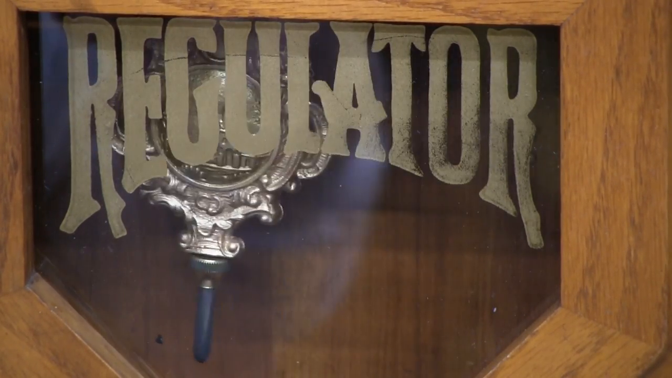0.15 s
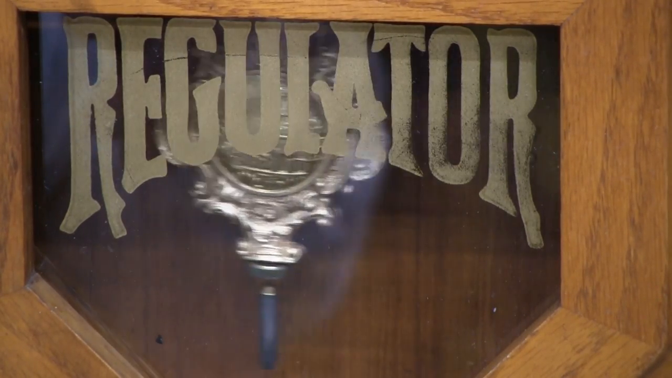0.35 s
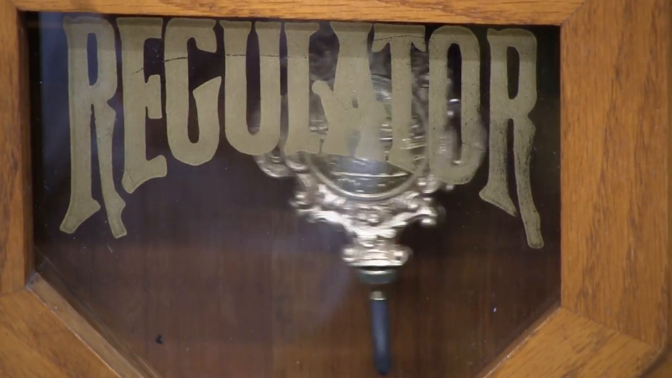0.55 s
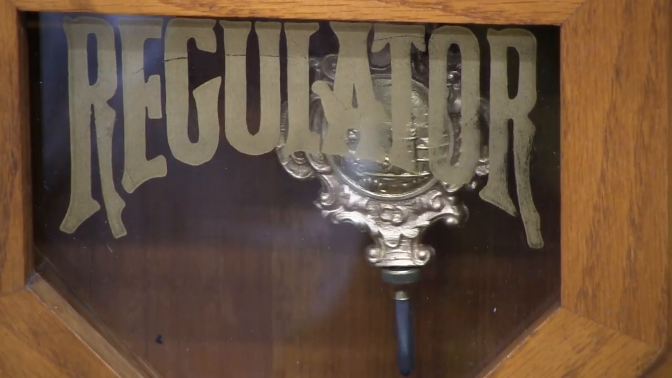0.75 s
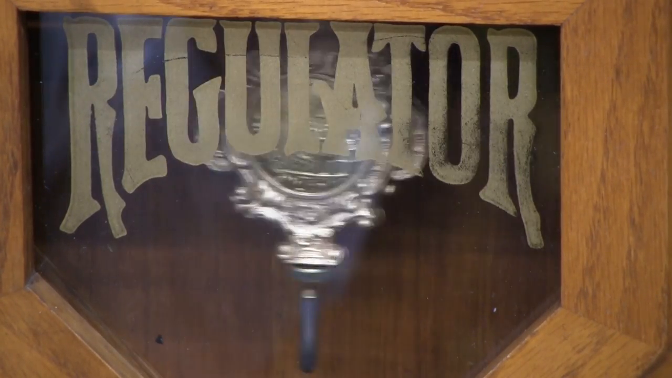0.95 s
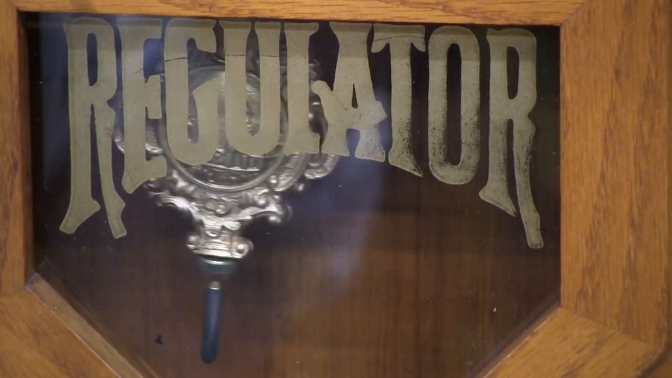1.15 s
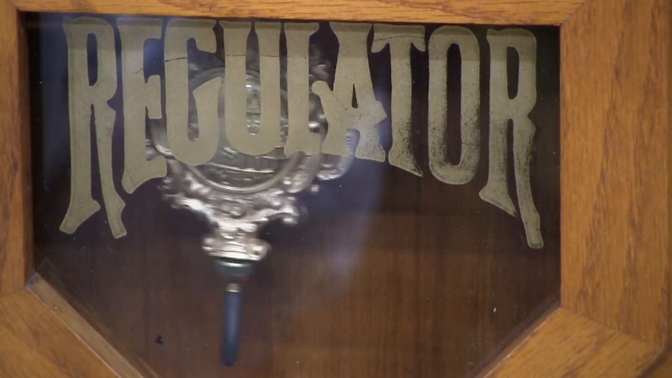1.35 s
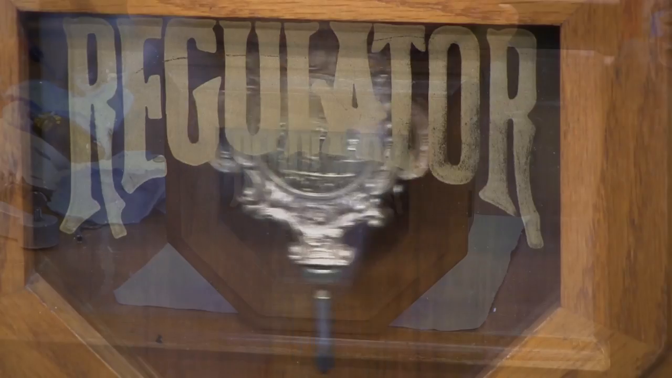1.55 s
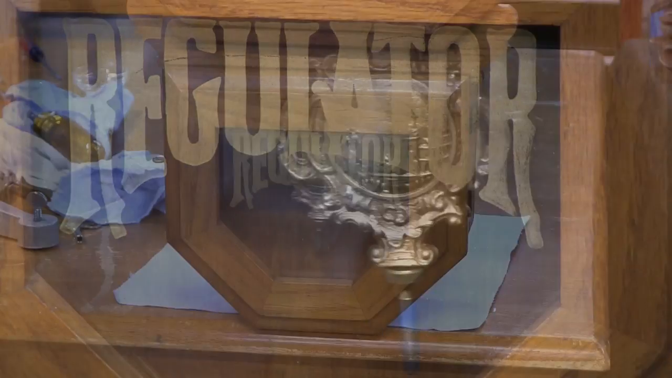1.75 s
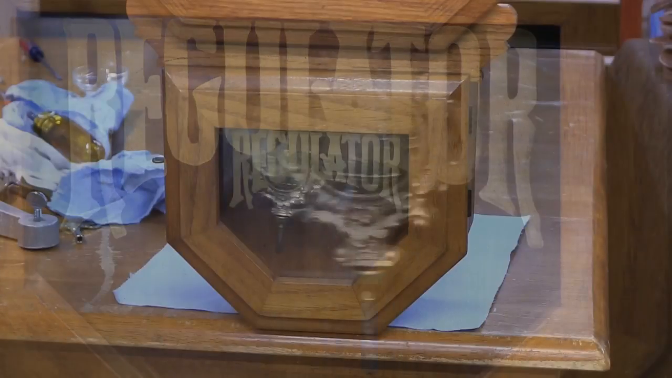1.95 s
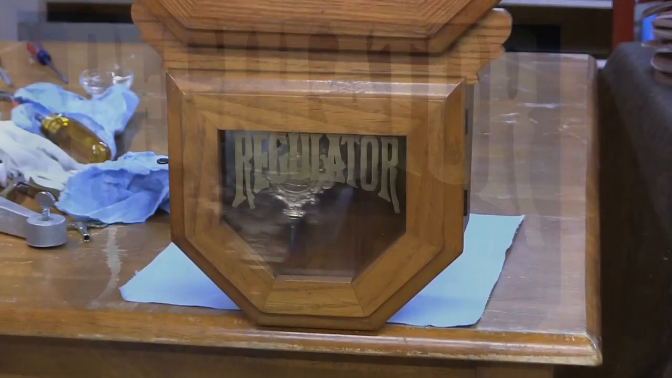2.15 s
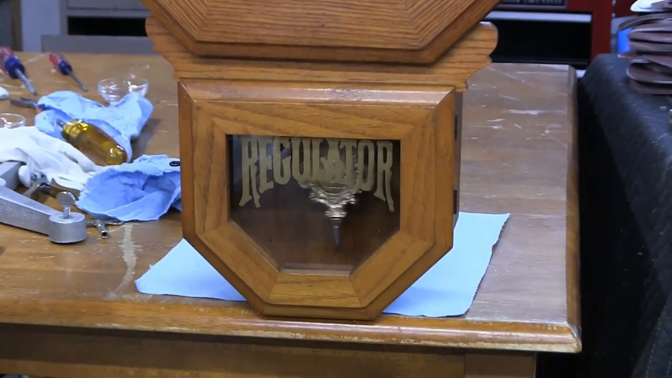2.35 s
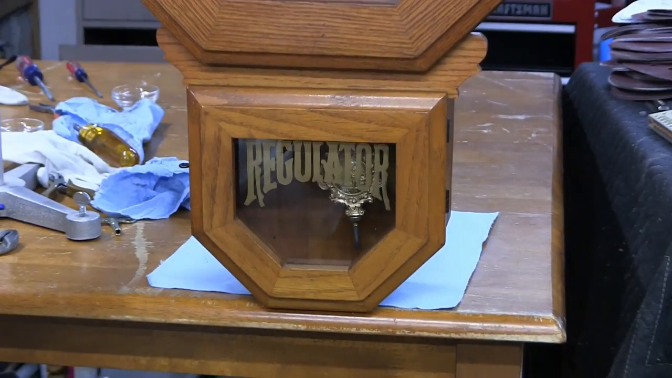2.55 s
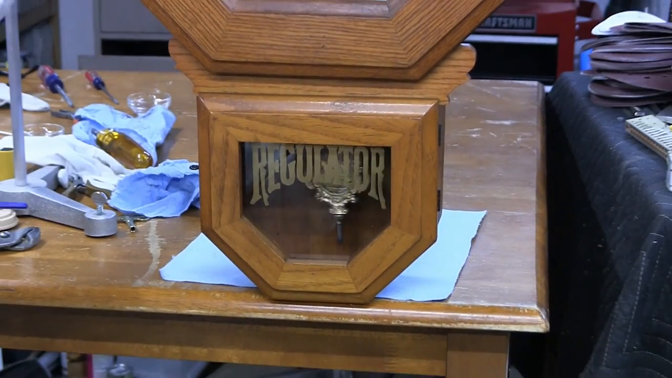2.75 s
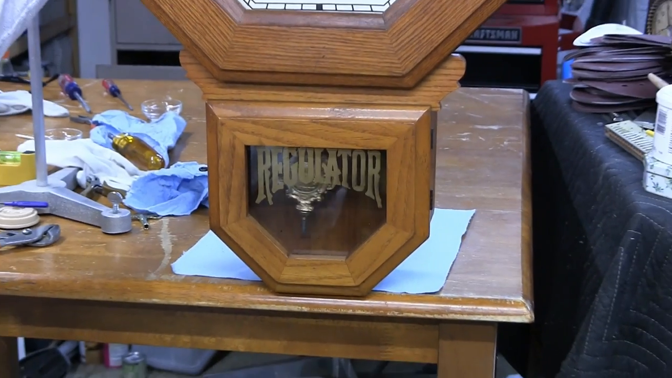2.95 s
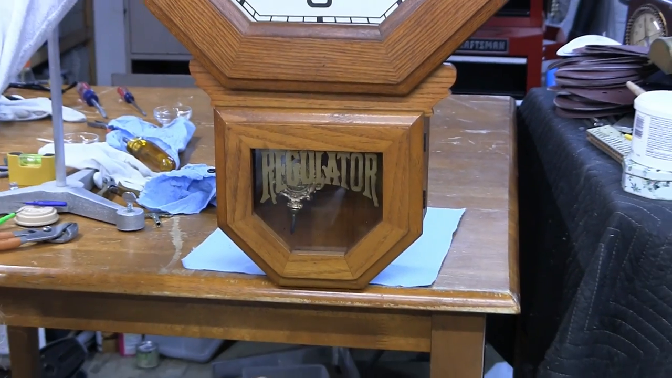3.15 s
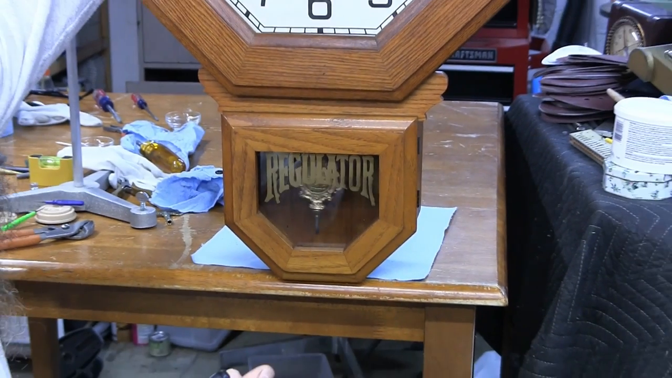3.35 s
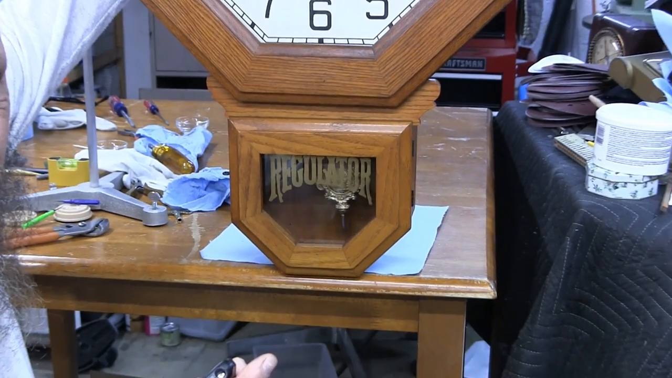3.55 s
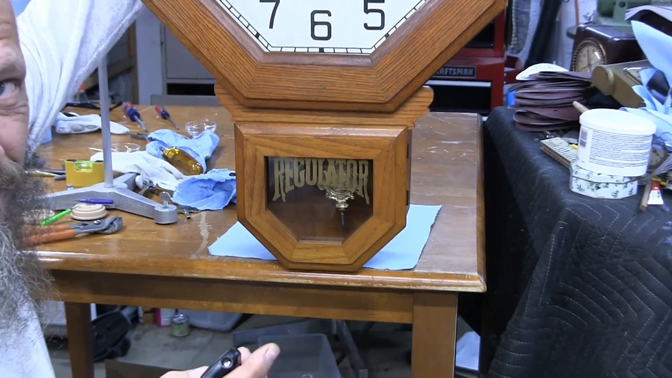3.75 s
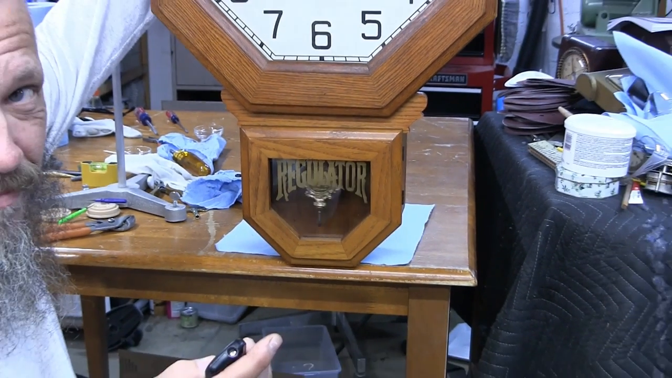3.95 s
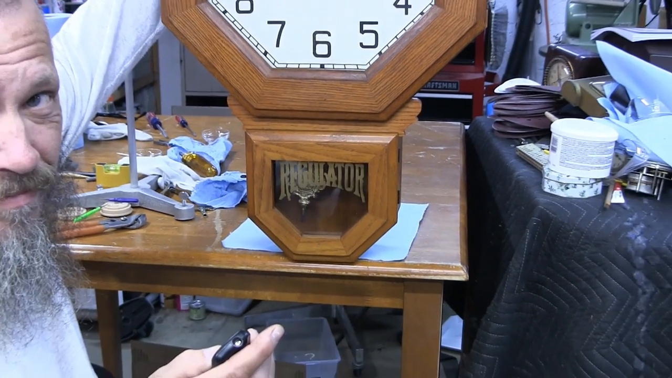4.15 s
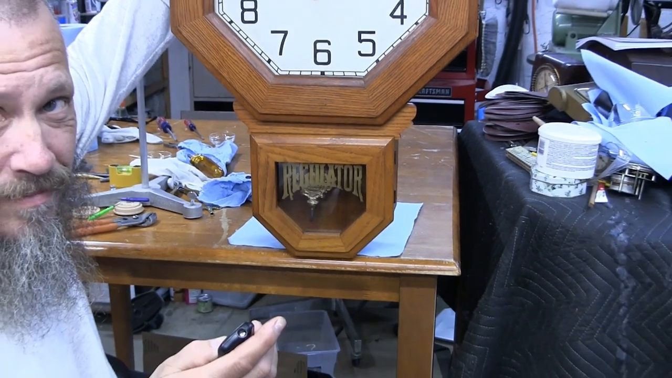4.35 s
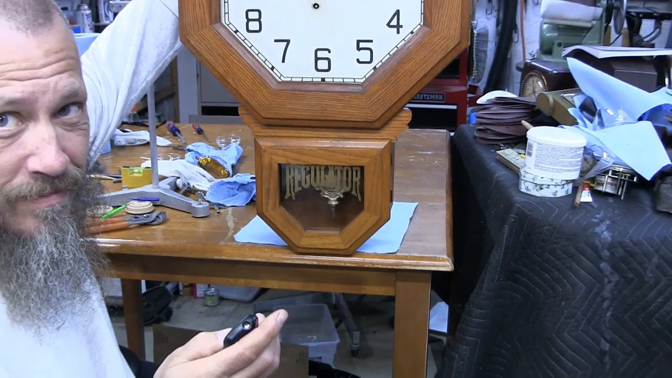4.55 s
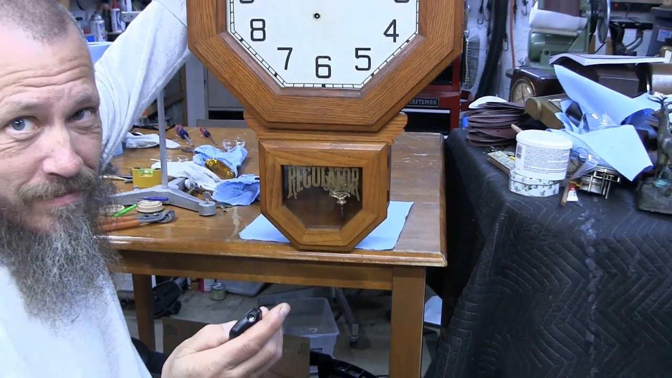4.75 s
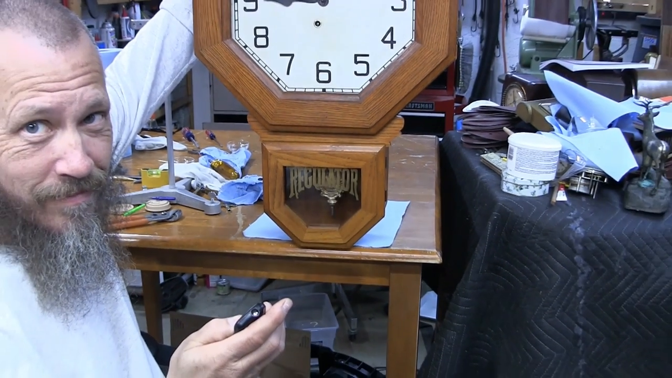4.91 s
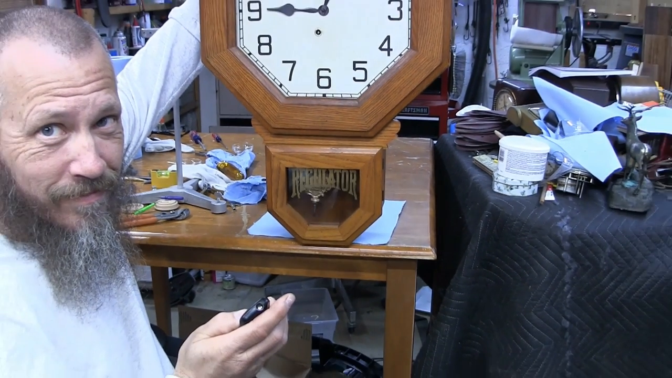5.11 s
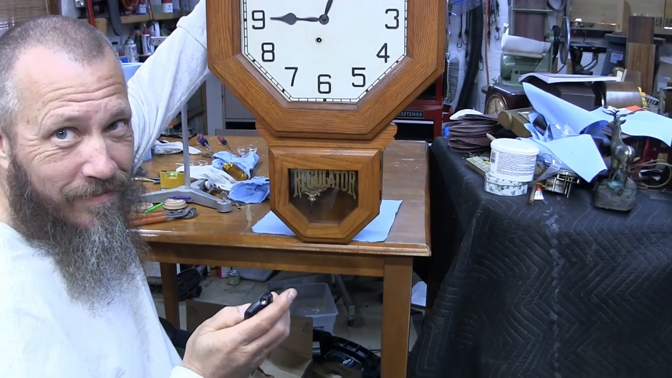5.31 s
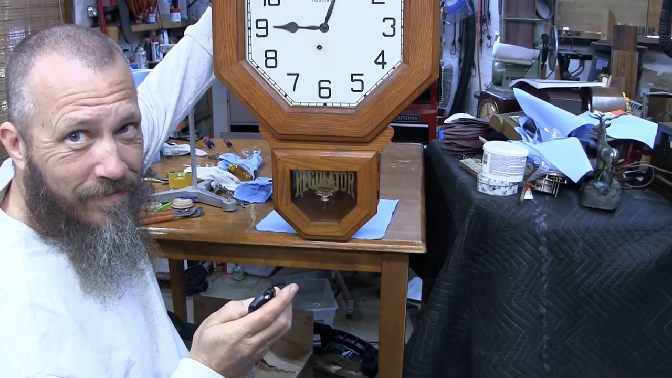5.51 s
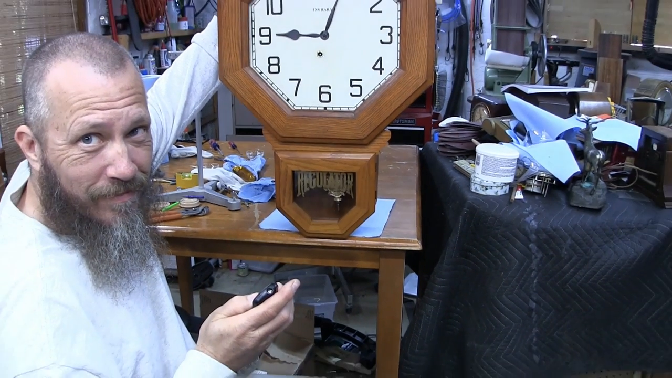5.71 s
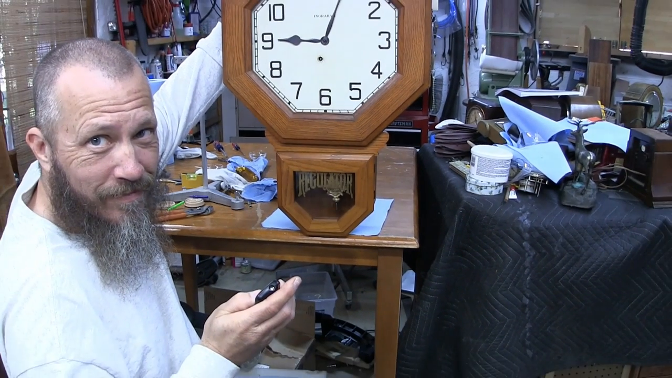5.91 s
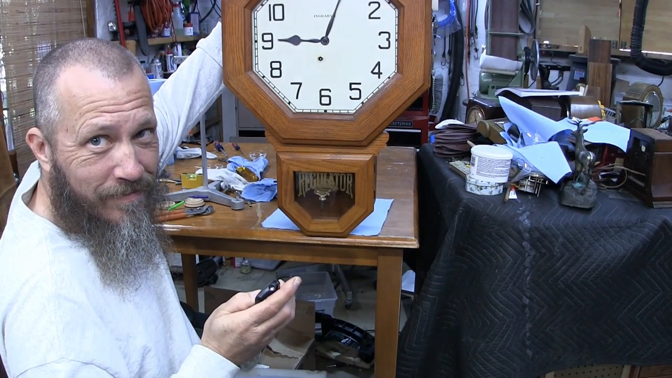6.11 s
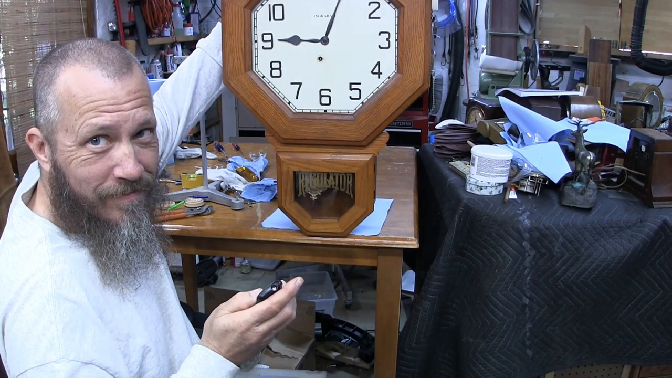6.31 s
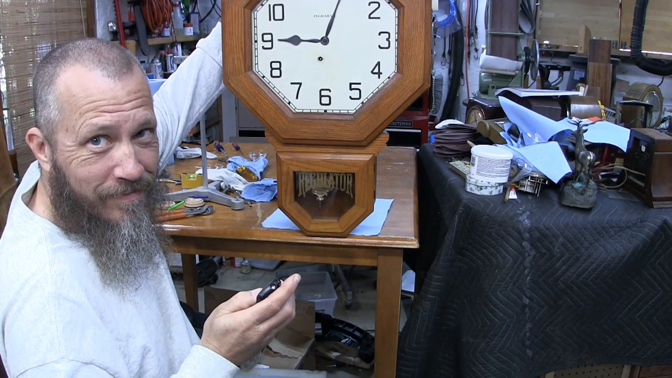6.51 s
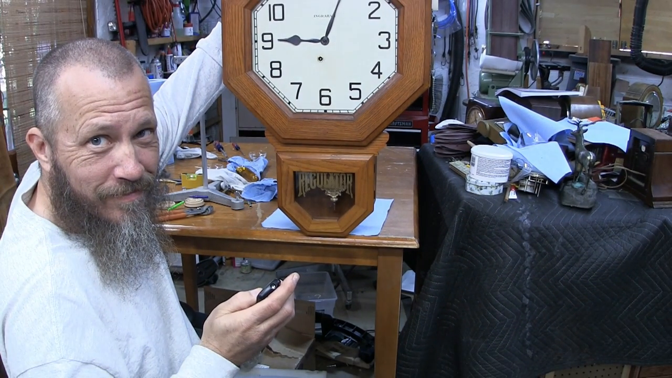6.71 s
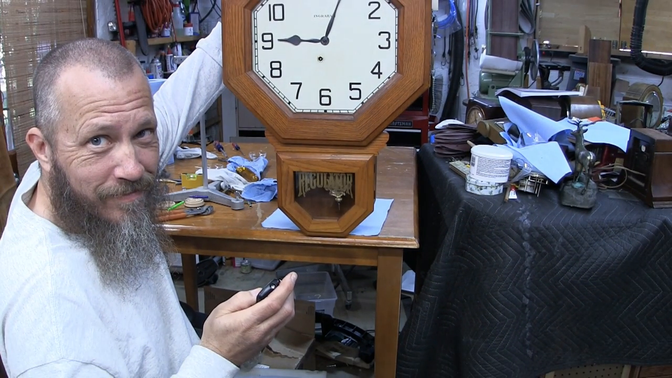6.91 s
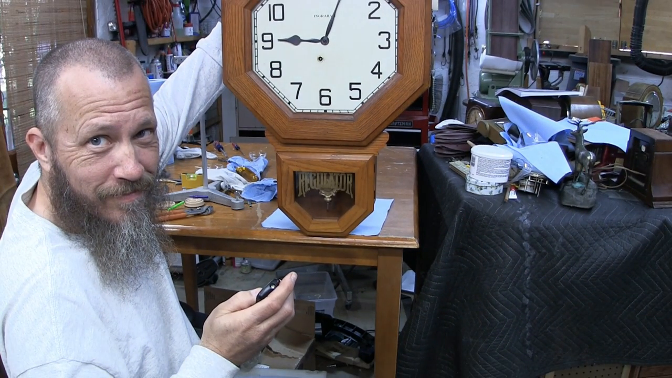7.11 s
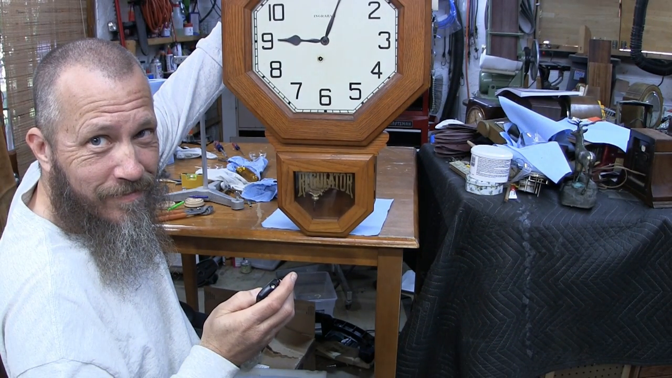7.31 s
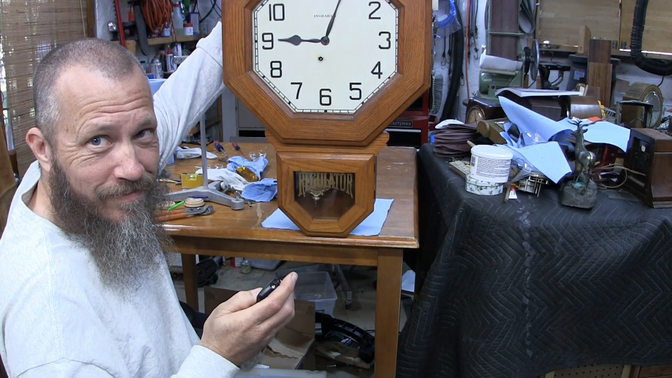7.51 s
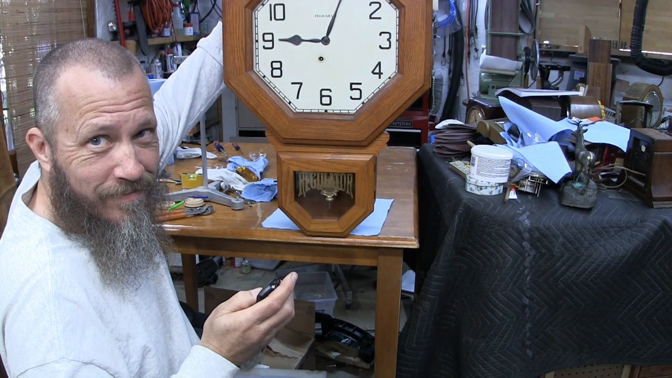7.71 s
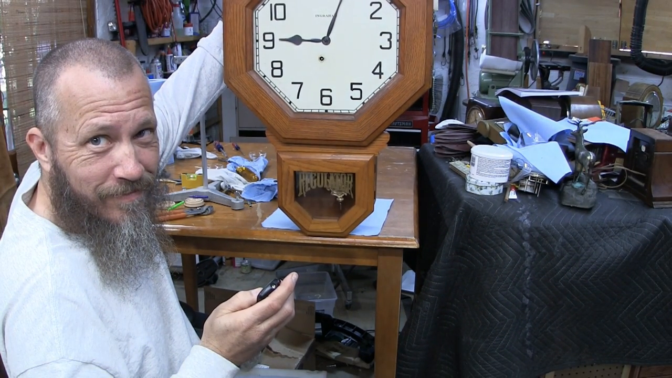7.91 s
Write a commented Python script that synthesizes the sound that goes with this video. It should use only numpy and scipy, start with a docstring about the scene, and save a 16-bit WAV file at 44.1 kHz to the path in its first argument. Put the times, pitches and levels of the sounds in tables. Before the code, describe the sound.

The slightly uneven tick-tock of a mechanical wall clock, with faint room noise and a low hum behind it.

```python
"""Tick, tock: a wooden pendulum clock ticks slightly unevenly on a table in a quiet workshop.
On every swing a toothed wheel drops onto two steel catches (pallets) in turn, and each one rings
the brass plates and the wooden case with its own tone. Early on, one run of ticking fades into
a second that is out of step with it. A motor hums far off under soft room noise,
with a few faint clicks and thin, high chirps."""
import sys
import numpy as np
from scipy import signal
from scipy.fft import rfft, irfft
from scipy.io import wavfile
from scipy.ndimage import uniform_filter1d

SR = 44100
rng = np.random.default_rng(int(sys.argv[2]) if len(sys.argv) > 2 else 0)


def bounce(signal):
    """Save signal as a 16-bit WAV file at the path given by the first command-line argument."""
    frames = np.transpose(np.atleast_2d(signal))
    limited = np.clip(frames, -1, 1)
    pcm = np.round(limited * 32767).astype(np.int16)
    wavfile.write(sys.argv[1], SR, pcm)


N = 355887
TIME = np.arange(N) / SR
RING_SIZE = 16384  # samples in one ringing sound
RING_TIME = np.arange(RING_SIZE) / SR


def gain(db):
    """Turn decibels into a number to multiply by."""
    return 10 ** (np.asarray(db) / 20)

def fade(ring_s, rise_s):
    """A level that builds up over rise_s and dies away by 60 dB in ring_s."""
    return (1 - np.exp(-RING_TIME / rise_s)) * np.exp(-np.log(1000) * RING_TIME / ring_s)

def colour(sound, hz, db):
    """Make each frequency louder or softer, following a curve through (hz, db) points."""
    all_hz = np.maximum(np.fft.rfftfreq(sound.shape[-1], 1 / SR), 1)
    curve_db = np.interp(np.log(all_hz), np.log(hz), db)
    return irfft(rfft(sound) * gain(curve_db), sound.shape[-1])

def noise_band(size, hz, width_hz):
    """Noise gathered around one pitch."""
    noise = signal.lfilter(*signal.iirpeak(hz, hz / width_hz, fs=SR), rng.standard_normal(size))
    return noise / noise.std()

def muffle(sound, hz):
    """Soften the treble above hz."""
    return signal.sosfilt(signal.butter(2, hz, fs=SR, output="sos"), sound)

def wander(rate_hz):
    """A smooth random curve that heads for a new value rate_hz times a second."""
    hold = int(SR / rate_hz)
    steps = np.repeat(rng.standard_normal(N // hold + 1), hold)
    curve = uniform_filter1d(uniform_filter1d(steps, hold), hold)[:N]
    return curve / curve.std()

def stereo(shared, side):
    """Left and right: the side part is added to one and taken from the other."""
    return np.array([shared + side, shared - side])

def add(out, start_s, sound):
    """Mix a sound in at start_s."""
    i = int(start_s * SR)
    out[:, i:i + sound.shape[-1]] += sound[..., :N - i]

def run_gain(run, time_s, start_s=1.38, length_s=1.04, curve=1.25):
    """The first run of ticking fades out as the second fades in; the level dips between them."""
    share = np.clip((time_s - start_s) / length_s, 0, 1)
    return (1 - share if run == "first" else share) ** curve


# The tone of the room's noise: pitch_hz, shared_db_per_hz, side_db_per_hz
ROOM_NOISE = [(20, -109, -104), (55, -83.5, -96), (89, -84, -84), (108.6, -75, -79.5), (171, -82.5, -92.5),
              (212, -83, -82.5), (267, -85.5, -92.5), (285, -80.5, -90), (365, -87, -91.5),
              (736, -89.5, -93), (1410, -95, -99), (5000, -99, -102.5), (16000, -104, -105)]

def room_noise():
    """A soft, steady rush, strongest in the bass."""
    hz, shared_db, side_db = np.transpose(ROOM_NOISE)
    shared, side = rng.standard_normal((2, N)) * np.sqrt(SR / 2)
    return stereo(colour(shared, hz, shared_db), colour(side, hz, side_db))


# The tones in the motor's hum: pitch_hz, level_db
MOTOR_TONES = [(30, -82), (60, -94), (73.3, -58.5), (146.5, -70), (206.8, -73), (2048, -79.5)]

def motor_hum(waver_db=0.5, drift_radians=0.1, lean_right_db=1.2):
    """A far-off motor hums; each tone wavers a little in level and pitch."""
    hum = np.zeros(N)
    for hz, level_db in MOTOR_TONES:
        level = np.sqrt(2) * gain(level_db + waver_db * wander(1.8))
        hum += level * np.sin(2 * np.pi * hz * TIME + drift_radians * wander(2.06))
    return hum * gain([[-lean_right_db], [lean_right_db]])


# Thin, falling chirps: start_s, length_s, from_hz, to_hz, level_db
HIGH_CHIRPS = [(0.545, 0.096, 6850, 5460, -60), (3.052, .12, 5150, 4900, -61),
               (3.90, .11, 5120, 4700, -61.5), (7.68, .08, 5270, 5000, -62)]

def chirps(width_hz=250):
    """High tones slide downward, blurred by distance."""
    out = np.zeros((2, N))
    for start_s, length_s, from_hz, to_hz, level_db in HIGH_CHIRPS:
        size = int(length_s * SR)
        glide = np.sin(2 * np.pi * np.cumsum(np.linspace(from_hz, to_hz, size)) / SR)
        blur = np.array([noise_band(size, width_hz / 2, width_hz) for _ in range(2)])
        add(out, start_s, 2 * gain(level_db) * glide * blur * np.hanning(size))
    return out


# Faint clicks in the room: start_s, level_db, pitch_hz
ROOM_CLICKS = [(.29, -58, 2290), (0.778, -54, 1800), (2.238, -47.5, 1040), (2.815, -45.5, 925)]

def clicks(ring_s=0.066, width_hz=650, boost_db=4):
    """Small things touch softly, so each click is dull, with little treble."""
    out = np.zeros((2, N))
    for start_s, level_db, hz in ROOM_CLICKS:
        noise = stereo(noise_band(RING_SIZE, hz, width_hz), .3 * noise_band(RING_SIZE, hz, width_hz))
        add(out, start_s, gain(level_db + boost_db) * muffle(noise, 2 * hz) * fade(ring_s, 0.0013))
    return out


def landing_db(hz, knock_db, hollow_db, bright_db):
    """The way a tooth lands changes the low knock, the hollow middle and the bright top."""
    points_hz = [200, 450, 1000, 1800, 3000, 4500]
    return np.interp(np.log(hz), np.log(points_hz), [0, knock_db, hollow_db, 0, 0, bright_db])

def ring(notes, column, tone, rise_s, scatter_db=1, scatter_radians=0.48):
    """One blow rings all of a part's notes; no two teeth land quite alike."""
    hz, ring_s, *strike_db = np.transpose(notes)
    level_jitter, phase_jitter = rng.standard_normal((2, len(hz)))
    phase = np.pi * np.arange(len(hz)) + scatter_radians * phase_jitter  # neighbours swing opposite ways
    waves = np.sin(2 * np.pi * hz[:, None] * RING_TIME + phase[:, None]) * fade(ring_s[:, None], rise_s)
    return gain(strike_db[column] + landing_db(hz, *tone) + scatter_db * level_jitter) @ waves


TICK, TOCK, SLIP = 0, 1, 2  # which level column to play
# The notes the wooden case rings at: pitch_hz, ring_s, tick_db, tock_db, slip_db
CASE_NOTES = [(218.6, 0.19, -7, -19, -23), (326.7, 0.13, -6, -17.5, -12), (398.4, 0.074, 3.5, -2, -2),
              (446.6, 0.12, 1.5, -3, -2.5), (512.6, 0.21, -12.5, -14.5, -19), (571.4, .15, -2, -.5, -24),
              (586.5, 0.08, -1.5, -1, -18), (757, 0.19, -11, -9.5, -10), (811, .13, -9.5, -11, -9),
              (1000, 0.11, -6, 4.5, -14), (1078, 0.17, -12, -3.5, -15), (1114, 0.18, -15, -4, -19)]

def wooden_case(column, tone, rise_s):
    """The case answers a tooth with a low, hollow knock."""
    return ring(CASE_NOTES, column, tone, rise_s)


# The notes the brass plates ring at: pitch_hz, ring_s, tick_db, tock_db, slip_db
PLATE_NOTES = [(1498, 0.2, -11.5, -8.5, -24), (1626, 0.15, -5, -6, -22), (1743, 0.15, -9.5, -7, -24),
               (1767, 0.13, -2.5, -8, -22), (1900, 0.13, -6, -7.5, -21), (1965, 0.1, 3.5, -8, -20),
               (2068, 0.12, -3, -20, -19), (2193, 0.16, -6, -2, -13), (2262, 0.18, -13, -11, -8.5),
               (2440, 0.2, -9.5, -28, -21), (2506, 0.19, -6, -5.5, -14), (2687, 0.12, 4, -2, -12),
               (2810, 0.19, -11, -14, -20), (2880, 0.1, -10, -7, -28), (3053, 0.16, -8.5, -7, -18),
               (3135, 0.16, -12.5, -6, -14), (3267, 0.15, -12, -7.5, -13), (3970, 0.12, -19, -10.5, -20),
               (4077, 0.2, -7.5, -17.5, -27), (4370, 0.18, -15.5, -11.5, -31),
               (5956, 0.23, -17.5, -26, -21), (7623, 0.18, -10, -14.5, -22), (7663, 0.2, -13, -12, -31)]

def brass_plates(column, tone, rise_s):
    """The plates that hold the gears answer with a high, metallic ring."""
    return ring(PLATE_NOTES, column, tone, rise_s)


def grain(ring_s):
    """Noise that stands for many crowded notes and echoes, evened out from low to high."""
    noise = rng.standard_normal((2, RING_SIZE))
    power = uniform_filter1d(abs(rfft(noise * fade(ring_s, 0.0013))) ** 2, size=30, axis=-1)
    noise = irfft(rfft(noise) / np.sqrt(power))
    return noise / noise.std()


# The clock's many weaker notes, as one curve: pitch_hz, tick_db, tock_db
WEAK_NOTES = [(130, -14, -33), (210, -3.5, -8), (463, 5, 1), (700, -4, -1), (1280, -4, -1), (1800, 3, -1),
              (3220, -1.5, -1.5), (3530, -9, -9.5), (3930, -4.5, -11), (4700, -11, -15.5),
              (7100, -19, -13.5), (8020, -9.5, -17), (8350, -19.5, -29), (14100, -30, -30)]

def wash(noise, column, tone, ring_s, rise_s, side_db=-8, room_db=-23, room_ring_s=0.5):
    """Weak notes and nearby echoes blur together, then the room rings on."""
    hz, *strike_db = np.transpose(WEAK_NOTES)
    shared, side = colour(noise, hz, strike_db[column] + landing_db(hz, *tone))
    envelope = fade(ring_s, rise_s) + gain(room_db) * fade(room_ring_s, 0.018)
    return stereo(shared, gain(side_db) * side) * envelope


# How long before the tock a tooth slips, for each run: lead_s
SLIP_LEADS = {"first": 0.098, "second": 0.077}

def tooth_slip(out, run, tock_s, knock_db, notes_db=-46, wash_db=-48, bright_db=7, ring_s=0.32):
    """Before each tock, a tooth slides along the pallet and softly stirs the case and plates."""
    start_s = tock_s - SLIP_LEADS[run]
    tone = (knock_db, 0, 0)
    notes = wooden_case(SLIP, tone, rise_s=0.0038) + brass_plates(SLIP, tone, rise_s=0.0038)
    blur = wash(grain(ring_s), TOCK, (knock_db, 0, bright_db), ring_s, rise_s=0.0026)
    add(out, start_s, run_gain(run, start_s) * (gain(notes_db) * notes + gain(wash_db) * blur))

def tooth_scrape(drag_s, level_db=-53, louder_db_per_s=190, shortest_s=.009, stretch=0.4):
    """A tooth rubs off the pallet's edge; the more it drags, the louder and longer the rub."""
    drag_s = max(drag_s, 0)
    size = int((shortest_s + stretch * drag_s) * SR)
    rub = noise_band(size, hz=2400, width_hz=1500)
    return gain(level_db + louder_db_per_s * drag_s) * rub * np.linspace(0, 1, size)

def tooth_crack(pitch_hz=2350):
    """Steel meets brass: a sharp snap, only a few waves long."""
    snap = np.sin(2 * np.pi * pitch_hz * RING_TIME) * fade(ring_s=0.0027, rise_s=0.00089)
    snap = muffle(snap, 5000)  # heard through the shut case
    return snap / abs(snap).max()


# How each pallet sounds: case_db, case_rise_s, plates_db, wash_ring_s, crack_db, bounce_s, bounce_db
PALLET_SOUNDS = {"tick": (-35, .004, -37.5, 0.1678, -27, .0045, -24),
                 "tock": (-32.8, .008, -37, 0.1715, -23, 0.0093, -36)}
# How a tooth lands on each pallet: level_db, knock_db, hollow_db, bright_db
PALLET_LANDINGS = {"tick": (0.45, -2.6, 1.8, -1.3), "tock": (1.1, 1.2, -1.8, -0.4)}
# One tooth passes per swing and colours both beats: run, tick_s, tock_s, knock_db, hollow_db
PENDULUM_SWINGS = [("first", 0.0638, 0.6549, -1, 1), ("first", 1.1356, 1.7510, -1, -1),
                   ("first", 2.203, 2.8, 2, 0), ("second", 1.9180, 2.4748, -0.5, 2.5),
                   ("second", 2.9850, 3.5550, -1, 1.3), ("second", 4.056, 4.6308, 0, 0.3),
                   ("second", 5.1273, 5.7114, 0.3, -1.5), ("second", 6.1980, 6.7964, 3.2, -2.5),
                   ("second", 7.2730, 7.8496, 0.7, -1)]

def clock(wash_db=-24, fresh_grain=0.47, usual_gap_s=0.575, softer_db_per_s=70, lean_left_db=.22):
    """Each tooth lands with a crack and a bounce; the plates ring at once, the case just after."""
    beats, slips = np.zeros((2, 2, N))
    for column, pallet in [(TICK, "tick"), (TOCK, "tock")]:
        case_db, case_rise_s, plates_db, ring_s, crack_db, bounce_s, bounce_db = PALLET_SOUNDS[pallet]
        level_db, knock_db, hollow_db, bright_db = PALLET_LANDINGS[pallet]
        pattern = grain(ring_s)  # a pallet stirs the clock in much the same way on every beat
        for run, tick_s, tock_s, tooth_knock_db, tooth_hollow_db in PENDULUM_SWINGS:
            start_s = tock_s if column == TOCK else tick_s
            # a tooth that drags lands later and softer
            drag_s = tock_s - tick_s - usual_gap_s if column == TOCK else 0
            strength = gain(level_db - softer_db_per_s * drag_s) * run_gain(run, start_s)
            tone = (knock_db + tooth_knock_db, hollow_db + tooth_hollow_db, bright_db)
            case = gain(case_db) * wooden_case(column, tone, case_rise_s)
            plates = gain(plates_db) * brass_plates(column, tone, rise_s=0.0014)
            noise = pattern + fresh_grain * grain(ring_s)
            blur = gain(wash_db) * wash(noise, column, tone, ring_s, rise_s=0.0019)
            add(beats, start_s, strength * (case + plates + blur))
            add(beats, start_s + 0.001053, strength * gain(crack_db) * tooth_crack())
            add(beats, start_s + bounce_s, strength * gain(bounce_db) * tooth_crack())
            rub = tooth_scrape(drag_s)
            add(beats, start_s - len(rub) / SR, strength * rub)  # ends as the tooth lands
    for run, _, tock_s, tooth_knock_db, _ in PENDULUM_SWINGS:
        tooth_slip(slips, run, tock_s, knock_db=tooth_knock_db - 1)
    return beats * gain([[lean_left_db], [-lean_left_db]]) + slips


def scene(background_db=-0.35):
    """The clock in its workshop; room noise and hum dip where the two runs of ticking cross."""
    dip = np.hypot(run_gain("first", TIME), run_gain("second", TIME)) ** 0.75
    return clock() + clicks() + chirps() + (room_noise() + motor_hum()) * gain(background_db) * dip

def record(dry, top_hz=15900):
    """Cut away the very highest treble."""
    return signal.sosfilt(signal.ellip(10, .1, 70, top_hz, fs=SR, output="sos"), dry)


dry = scene()
out = record(dry)
bounce(out)
```